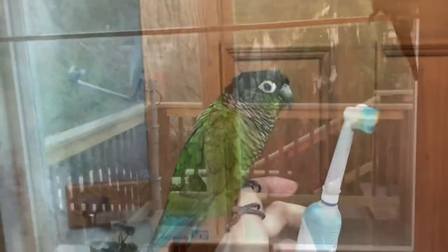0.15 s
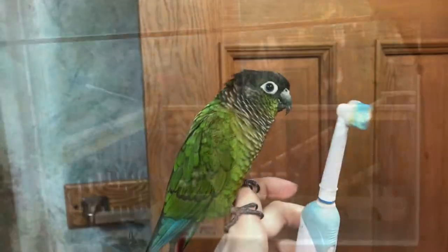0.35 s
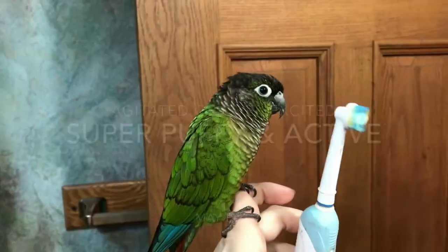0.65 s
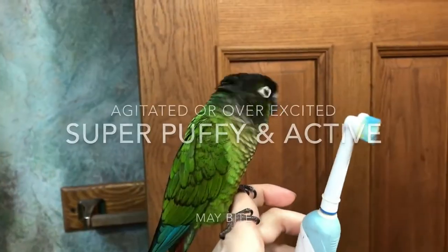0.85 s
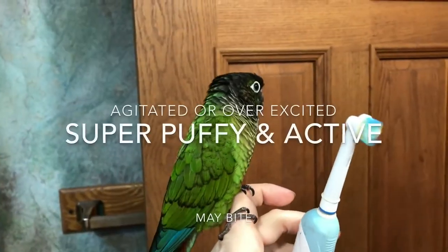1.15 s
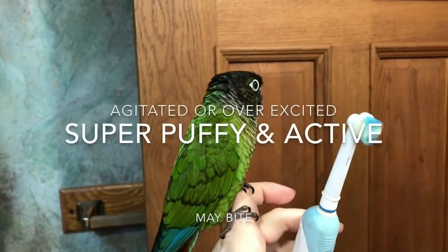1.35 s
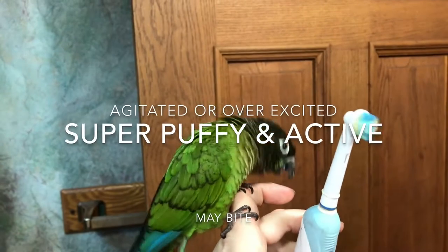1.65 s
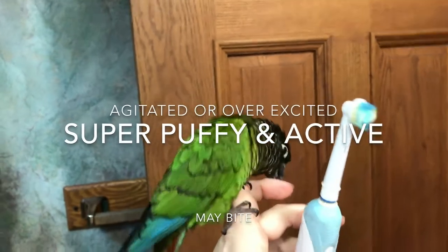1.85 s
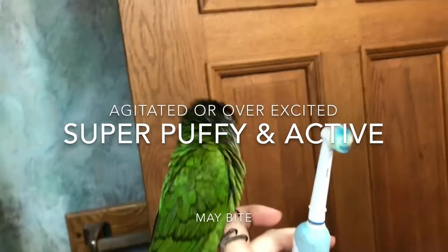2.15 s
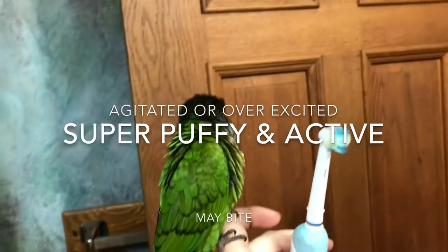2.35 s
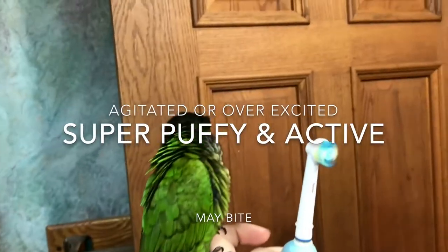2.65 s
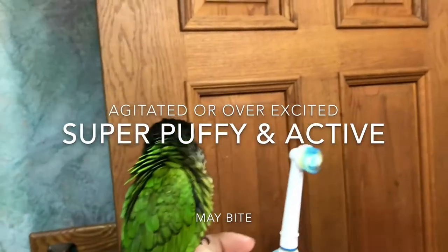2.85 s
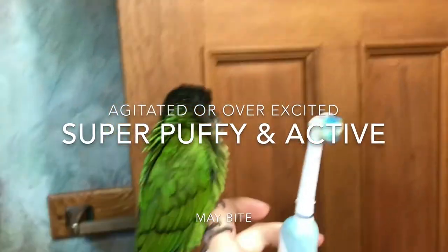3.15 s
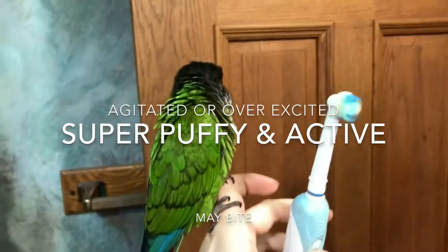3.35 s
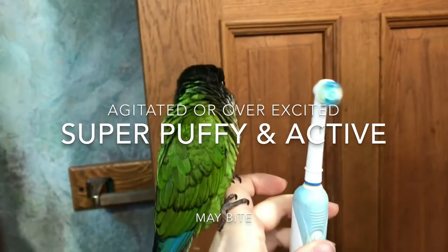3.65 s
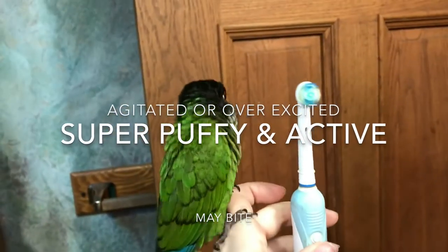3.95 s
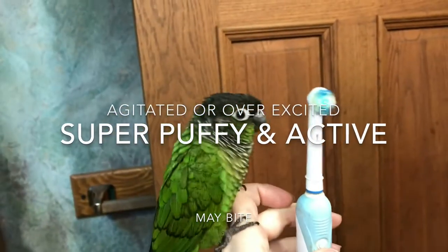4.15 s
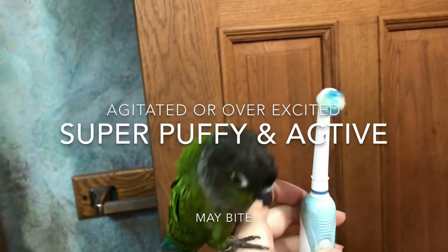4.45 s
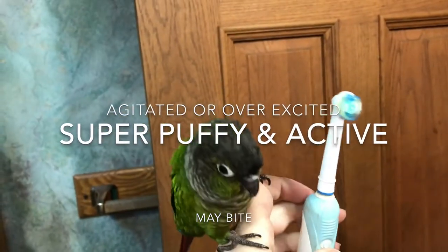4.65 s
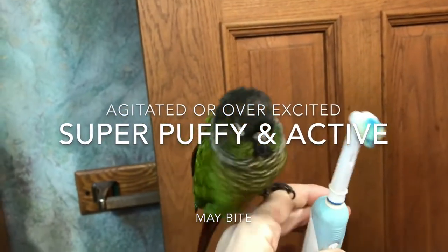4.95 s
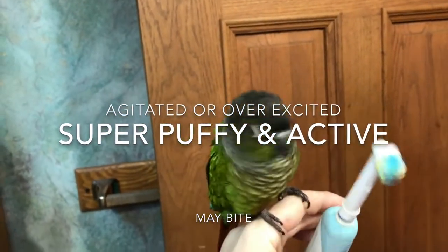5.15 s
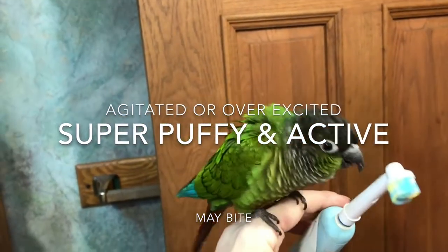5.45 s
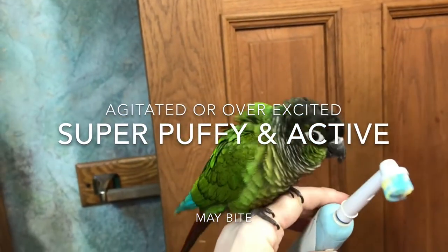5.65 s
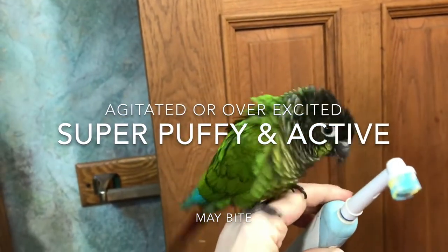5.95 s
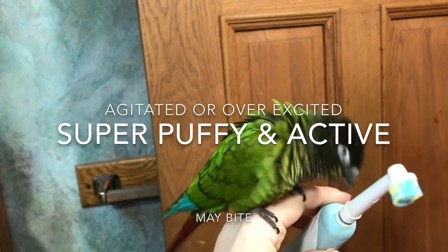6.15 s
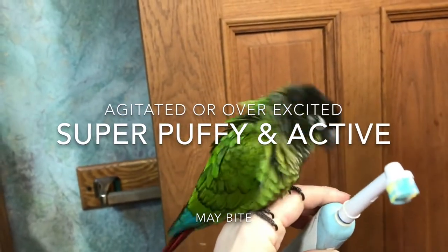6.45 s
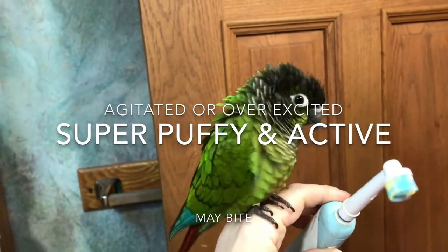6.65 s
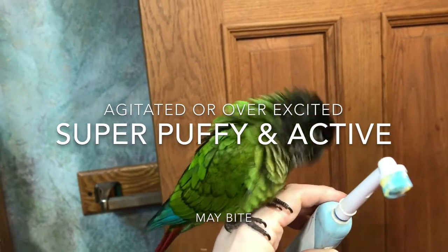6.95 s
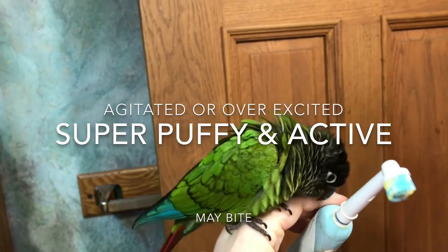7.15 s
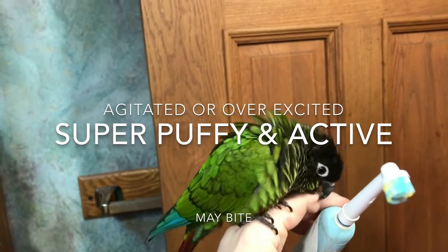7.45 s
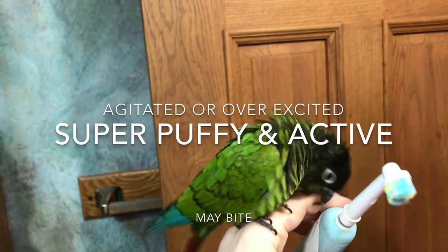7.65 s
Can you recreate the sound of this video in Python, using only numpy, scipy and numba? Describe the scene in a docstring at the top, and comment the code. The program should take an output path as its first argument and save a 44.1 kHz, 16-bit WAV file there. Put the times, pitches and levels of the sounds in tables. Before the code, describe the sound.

An electric toothbrush runs close to the microphone with a steady, rattling plastic buzz. At the start, two short, shrill bird shrieks echo from further off in the room. A small parrot nearby makes a few faint peeps, then gives a harsh, throbbing squawk and, a little later, a longer and louder one. The buzz turns slightly thinner between the two squawks. Low room noise and a faint hum lie behind.

```python
"""A panelled room, a phone microphone close to a running electric toothbrush. Two echoing shrieks, sung
with both sides of a bird's syrinx, open the scene; then a small parrot on a hand nearby peeps and gives
harsh, throbbing squawks. In the brush an 8-tooth pinion drives an 11-tooth wheel, and every mesh rattles
the plastic shell. Behind lie low room noise and a distant hum. The phone ducks under loud calls."""
import sys
import numpy as np
from scipy import signal
from scipy.fft import rfft, irfft
from scipy.io import wavfile
from scipy.ndimage import uniform_filter1d
from numba import njit

SR = 44100
rng = np.random.default_rng(int(sys.argv[2]) if len(sys.argv) > 2 else 0)


def int16_out(signal):
    """Quantize to a 16-bit WAV file."""
    q = np.round(np.clip(np.atleast_2d(signal).T, -1, 1) * 32767)
    wavfile.write(sys.argv[1], SR, q.astype(np.int16))


N = 343980
T = np.arange(N) / SR
RELEASE_S = .006  # of shrieks and squawks

# The two voices of the syrinx and their mixing tones: multiple of the lower voice, of the upper voice
SYRINX_TONES = [(1, 0), (0, 1), (-1, 2), (3, -1), (1, 1), (4, -1), (2, 1), (5, -1), (2, -1)]
# The same tones: level/dB
SYRINX_DB = [-3, -2.5, -3, -8, -17, -15, -16, -16, -30]
# Two shrieks, the second in two parts, a list of rows for each part: # t/s, lower voice f/Hz, upper voice f/Hz,
# level/dB, octave of the lower voice level/dB
SHRIEKS = [
    [(0, 3046, 4635, -19, 13), (.016, 3270, 4656, -9, 2), (.058, 3217, 4490, -11.5, -4),
     (.065, 3025, 4450, -26.5, 22), (.071, 3157, 4460, -13.5, 10), (.078, 3090, 4500, -47, 10)],
    [(.406, 2730, 4080, -34, 1), (.411, 2680, 4010, -27, -5), (.418, 2750, 4160, -29, 2)],
    [(.418, 3155, 4300, -33, 14), (.423, 3170, 4530, -27, 11), (.435, 3155, 4440, -20, -4),
     (.447, 3170, 4590, -28, 14), (.456, 2960, 4530, -27, 8.5), (.47, 2970, 3760, -24, 3),
     (.485, 3040, 3900, -38, 7)],
]
def shriek(rows, base_rough):
    """Two whistling voices in one windpipe mix into sum and difference tones."""
    start, end = rows[0][0], rows[-1][0]
    t = np.arange(start, end, 1 / SR)
    low_hz, high_hz, db, octave_db = curves(rows, t)
    # starts hoarse, clears, and frays again as the air runs out
    rough = base_rough + .37 * np.exp(-(t - start) / .011) + .3 * ((t - start) / (end - start)) ** 4
    low, high = (phase_of(hz * (1 + .049 * rough * wobble(len(t), 1400))) for hz in (low_hz, high_hz))
    tones = sum(undb(tone_db) * np.sin(a * low + b * high + k)
                for k, ((a, b), tone_db) in enumerate(zip(SYRINX_TONES, SYRINX_DB)))
    octave = undb(octave_db) * np.sin(2 * low)
    hiss = bandpass(bandpass(rng.standard_normal(len(t)), 2.2 * low_hz, 11000), 2.5 * low_hz, 13000)
    release = np.minimum((end - t) / RELEASE_S, 1)
    return undb(db) * release * (tones + octave + 2.7 * rough * hiss)


# Squawk syllables close to the phone: t/s, length/s, start and end level/dB, start and end pitch f/Hz,
# start and end throat f/Hz, roughness/0-1, throb f/Hz, throb depth/0-1, low, high and top band level/dB
SQUAWKS = [(4.482, .062, -48.5, -17.5, 2710, 3380, 2800, 3570, 0.63, 88, 0.8, -21, -14, -19),
           (4.548, 0.031, -20.5, -18.5, 3305, 3220, 3350, 3300, .55, 209, 0.6, -10, -8.5, -12),
           (4.579, .117, -22.5, -26.5, 3190, 3020, 3400, 3070, 0.67, 206, 0.76, -14, -6, -6.5),
           (6.142, 0.028, -17, -11.5, 858, 917, 3840, 3550, 0.39, 220, 0.28, -10, -5.5, -14),
           (6.172, .066, -17.5, -13.5, 887, 968, 3480, 3900, 0.69, 258, 0, -12, -2.5, -21),
           (6.237, .033, -17.5, -15.5, 1253, 1163, 4180, 4650, .4, 273, 0, -2, -4.5, -24),
           (6.267, 0.094, -26.5, -17, 1411, 1480, 3800, 4300, .7, 253, 0.46, -8, -2, -8.5),
           (6.349, .042, -12, -12.5, 1302, 1369, 3940, 4120, 0.61, 205, 0.23, -15, -3.5, -11.5),
           (6.391, 0.12, -14.5, -36, 1354, 1360, 4200, 4120, 0.76, 280, 0.3, -4, -7, -11)]
def squawk(length, start_db, end_db, start_hz, end_hz, throat_start_hz, throat_end_hz,
           rough, throb_hz, start_depth, low_db, high_db, top_db):
    """Unsteady membrane pulses and rushing air, chopped by a slower throb, ring the throat and beak."""
    t = np.arange(0, length + RELEASE_S, 1 / SR)
    # the throb deepens as the air runs out
    db, hz, throat_hz, depth = curves([(0, start_db, start_hz, throat_start_hz, start_depth),
                                       (length, end_db, end_hz, throat_end_hz, start_depth + .3)], t)
    envelope = np.clip(np.minimum(t / .0035, 1 + (length - t) / RELEASE_S), 0, 1)
    phase = phase_of(hz * (1 + .0847 * rough * wobble(len(t), 560)))
    pulses = sum(np.cos(k * phase + .36 * k * k) * (k * hz < TOP_HZ) for k in range(1, 17))
    source = (1 - rough) * level(pulses, 0) + rough * rng.standard_normal(len(t))
    throb = phase_of(throb_hz * (1 + .02 * wobble(len(t), 140)))
    opening = .59 * (.5 - .5 * np.cos(throb)) ** 2.6
    uneven = undb(1.5 * wobble(len(t), 200))
    source *= uneven * (1 - np.clip(depth, 0, 1) * (1 - opening))
    # throat (damped by a deep throb), side chamber, pipe overtones and beak: f/Hz, width/Hz, level/dB
    bands = [(throat_hz, 420 + 800 * depth.mean(), 0), (2450, 700, low_db), (5500, 1500, high_db - .5),
             (2 * throat_hz, 1400, high_db), (2.68 * throat_hz, 5500, top_db),
             (1700, 1100, -11 - 15 * depth)]
    voice = sum((-1) ** k * level(bandpass(bandpass(source, centre, width), centre, width), band_db)
                for k, (centre, width, band_db) in enumerate(bands))
    return undb(db) * envelope * voice


# Faint peeps of the parrot on the hand: t/s, length/s, start f/Hz, end f/Hz, level/dB
PEEPS = [(1.826, 0.022, 3280, 3970, -44), (1.881, 0.025, 2090, 2340, -42), (1.914, 0.035, 3500, 4420, -40),
         (1.968, .015, 4350, 3820, -40), (2.108, 0.011, 2500, 3050, -41), (2.116, 0.018, 3270, 3800, -37)]
def peep(length, start_hz, end_hz, db):
    """A soft, scratchy gliding whistle."""
    size = int(length * SR)
    scratch = 1 + 1.2 * wobble(size, 1500)
    return undb(db) * np.hanning(size) * scratch * np.sin(phase_of(np.linspace(start_hz, end_hz, size)))


def bird_calls(room_t60_s=.33, beak_cut_hz=1330):
    """Two shrieks, then the nearby parrot; the walls answer shrieks and squawks with a dense echo."""
    t = T[:SR // 2]
    walls = rng.standard_normal(len(t)) * undb(-60 * t / room_t60_s) * (t > .004)
    walls /= np.sqrt(np.sum(walls ** 2))
    shrieks = sum(place(rows[0][0], shriek(rows, rough)) for rows, rough in zip(SHRIEKS, (.12, .22, .17)))
    squawks = sum(place(s, squawk(*call)) for s, *call in SQUAWKS)
    # so small a bird radiates no lows
    squawks = signal.sosfilt(signal.butter(4, beak_cut_hz, "high", fs=SR, output="sos"), squawks)
    peeps = sum(place(s, peep(*call)) for s, *call in PEEPS)
    echo = signal.fftconvolve(undb(-11.5) * shrieks + undb(-10) * squawks, walls)[:N]
    return shrieks + squawks + peeps + echo


# Pinion teeth inside the brush: lateness/tooth, thud level/dB, knock level/dB, rattle level/dB
PINION = [(-0.041, 1.5, -17, -4), (0.097, -21, 34, -12.5), (0.076, 4.5, -4.5, -46), (0.2, -15, -27, -1),
          (0.18, 8.5, 31, -16.5), (-0.23, -25, -1.5, -4), (-0.19, -18, -9, -0.5), (-0.047, 7, -6, -9.5)]
# Wheel teeth, added to knock and rattle: level/dB
WHEEL_DB = [0.5, 0, 2, 0.5, 0, 3, 1.5, -5, -1.5, 1.5, -1.5]
def gears(teeth):
    """Each mesh of two teeth gives a thud; loose parts knock and rattle after it over a steady scrape."""
    mesh = np.arange(int(teeth[-1]) - 1)
    late, thud_db, knock_db, rattle_db = np.array(PINION)[mesh % len(PINION)].T
    wheel_db = np.array(WHEEL_DB)[mesh % len(WHEEL_DB)]
    thud_scatter, jitter, knock_scatter, rattle_scatter = rng.standard_normal((len(mesh), 4)).T

    def blows(lag, strength):
        times = np.interp(mesh + .5 + late + lag, teeth, T)
        return np.bincount((times * SR).astype(int), strength, N)

    # the wheel runs off centre, swinging the moment and strength of the thuds
    turn = 2 * np.pi * mesh / len(WHEEL_DB)
    thud = blows(.14 * np.sin(turn), undb(thud_db + 1.3 * thud_scatter) * (1 + .35 * np.cos(turn)))
    thud = level(thud, 0) + .55 * rng.standard_normal(N)
    chatter = np.exp(-T[:200] / .00054)
    knock = np.convolve(blows(.024 * jitter, undb(knock_db + wheel_db + .83 * knock_scatter)), chatter)
    rattle = np.convolve(blows(.054 * jitter, undb(rattle_db + wheel_db + .65 * rattle_scatter)), chatter)
    return thud, level(knock[:N] + .15, 0), level(rattle[:N] + .2, 0)


# Modes of the brush's neck and head, close to the phone: upright f/Hz, tilted f/Hz, width/Hz,
# upright level/dB, tilted level/dB, share of knock against rattle/0-1
NECK_MODES = [(2300, 2610, 750, -6.5, -11.5, 0), (3350, 3100, 510, -7.5, -14, 0.23),
              (4370, 3810, 1720, -3, -1.5, 0), (5450, 5450, 570, -5, -5, 0.27),
              (6440, 6800, 980, 1.5, 1.5, .1), (9300, 8850, 1260, -3.5, 0, 0),
              (10880, 11620, 960, -9, -9, 0), (13950, 13800, 3700, -8.5, -3.5, 0.1)]
def neck(knock, rattle, tilt):
    """The same knocks and rattles ring the modes of the neck and head as a noisy buzz."""
    sound = 0
    for hz, tilted_hz, width, db, tilted_db, share in NECK_MODES:
        drive = rng.choice([-1., 1.], N) * (share * knock + (1 - share) * rattle)
        centre = hz + tilt * (tilted_hz - hz)
        ring = bandpass(bandpass(drive, centre, width), centre, 4.3 * width)
        sound += level(ring, db + tilt * (tilted_db - db))
    return level(sound, 0)


# Modes of the plastic shell, close to the phone: f/Hz, width/Hz, level/dB
SHELL_MODES = [(683, 220, -7.5), (906, 43, -2.5), (1052, 73, -1.5), (1226, 86, 0), (1457, 280, -1.5),
               (2110, 390, -5.5)]
def shell(thud, tilt, db_per_octave=9, pivot_hz=1150):
    """The thuds ring the shell; tilting thins its lower modes."""
    sound = 0
    for k, (hz, width, db) in enumerate(SHELL_MODES):
        gain = undb(db + db_per_octave * tilt * np.log2(hz / pivot_hz))
        sound += (-1) ** k * gain * bandpass(thud, hz, width) / width ** .5
    return level(sound, -10 - 1.5 * tilt)


# Faint tones of the gears at close range: multiple of the pinion speed
GEAR_TONES = [10, 12, 13, 24, 14, 16, 21, 22]
# The same tones, brush upright: level/dB
GEAR_TONES_DB = [-29, -27, -23, -27, -32, -32, -34, -34]
# Their change at full tilt: level/dB
GEAR_TONES_TILT_DB = [-10, -1.5, -2, 3, 9, 13, 3, -5]
def whirr(teeth, tilt, start_hz=930, end_hz=1135):
    """The gears sing faintly, and a whirr glides up each time the same two teeth come round to meet."""
    angle = 2 * np.pi * teeth / len(PINION)
    round_share = (teeth / (len(PINION) * len(WHEEL_DB)) + .25) % 1
    swell = np.sin(np.pi * round_share ** 2)
    glide = undb(-9.5 - 12 * tilt) * np.sin(phase_of(start_hz + round_share * (end_hz - start_hz)))
    overtone = undb(-30 + 19.5 * tilt) * np.sin(15 * angle)  # takes over from the glide when tilted
    tones = sum(undb(db + tilt_db * tilt + .92 * wobble(N, 7.1)) * np.sin(k * angle)
                for k, db, tilt_db in zip(GEAR_TONES, GEAR_TONES_DB, GEAR_TONES_TILT_DB))
    return swell * (glide + overtone) + tones


# The hand tilts the brush in front of the phone: t/s, tilt/0-1
TILT = [(0, 0.11), (3.6, 0.3), (4.2, 0.21), (5.0, 0.24), (5.4, 1), (6.8, 1)]
def toothbrush(start_turns_per_s=72.49, sag_turns_per_s2=.146):
    """The gears shake neck and shell; the pinion slows as the battery sags."""
    tilt = curves(TILT, T)[0]
    teeth = np.cumsum(start_turns_per_s - sag_turns_per_s2 * T) * len(PINION) / SR  # teeth passed so far
    thud, knock, rattle = gears(teeth)
    sound = whirr(teeth, tilt) + neck(knock, rattle, tilt) + shell(thud, tilt)
    facing = undb(-35 - 1.5 * tilt)  # the shell turns its back on the phone
    return fade_in() * facing * sound


# Room tone at the microphone: f/Hz, relative spectral level/dB
ROOM_SPECTRUM = [(21, -33), (35, -2), (70, 2.5), (118, -3.5), (166, -10.5), (210, -7), (533, -10),
                 (800, -14), (1040, -64), (1760, -120)]
def room_tone():
    """The low noise of the room."""
    hz, db = np.transpose(ROOM_SPECTRUM)
    bins_hz = np.arange(N // 2 + 1) * SR / N + 1
    spectrum = undb(np.interp(np.log(bins_hz), np.log(hz), db))
    noise = irfft(rfft(rng.standard_normal(N)) * spectrum, N)
    return level(noise, -52) * fade_in()


# A hum far from the microphone: t/s, level/dB
HUM_SWELLS = [(0.0, -61), (0.59, -59.5), (1.93, -64), (2.93, -47), (4.74, -66), (5.28, -48), (5.32, -56),
              (7.71, -62), (7.8, -73)]
def distant_hum(hum_hz=78, upper_hz=162):
    """A swelling, wandering hum, with a tone of steady pitch about an octave over it."""
    phase = phase_of(hum_hz + 3 * wobble(N, 2.5))
    hum = undb(curves(HUM_SWELLS, T)[0] + 5.6 * wobble(N, 9.4)) * np.sin(phase)
    upper = undb(-59 + 3.1 * wobble(N, 9.6)) * np.sin(2 * np.pi * upper_hz * T)
    return hum + upper


def fade_in():
    """Brush and room tone come up by 4 dB in the first moments."""
    return undb(np.interp(T, [.29, .56], [-4, 0]))


def undb(db):
    return 10 ** (np.asarray(db) / 20)


def level(x, db):
    return x * undb(db) / np.sqrt(np.mean(x ** 2))


def phase_of(hz):
    return 2 * np.pi * np.cumsum(hz) / SR


def curves(table, t):
    """The columns of a table, joined by straight lines over the times t."""
    s, *columns = np.transpose(table)
    return [np.interp(t, s, c) for c in columns]


def wobble(size, hz):
    """Smooth chance with spread 1 that changes about hz times a second."""
    k = max(int(SR / hz), 1)
    x = uniform_filter1d(uniform_filter1d(rng.standard_normal(size), k), k)
    return x / x.std()


def place(s, sound):
    """The sound at time s in a silent track."""
    at = int(s * SR)
    return np.pad(sound, (at, N - at - len(sound)))


@njit
def bandpass(x, hz, width):
    """A resonance with gain 1 at its centre, which may move."""
    centre = hz * np.ones(len(x))
    y, band, low = np.empty(len(x)), 0., 0.
    for i in range(len(x)):
        g, damping = np.tan(np.pi * centre[i] / SR), width / centre[i]
        v = (band + g * (x[i] - low)) / (1 + g * (g + damping))
        band, low, y[i] = 2 * v - band, low + 2 * g * v, damping * v
    return y


@njit
def follow(x, attack_s, release_s):
    """Loudness that rises fast and sinks slowly."""
    y, loud = np.empty(len(x)), x[0]
    for i in range(len(x)):
        loud += (x[i] - loud) / (SR * (attack_s if x[i] > loud else release_s))
        y[i] = loud
    return y


def scene():
    """Bird calls and brush, the room behind them, in mono."""
    return (bird_calls() + toothbrush() + room_tone() + distant_hum())[None]


TOP_HZ = 15750  # upper limit of the phone
def record(dry):
    """The phone's gain ducks under loud calls and creeps back; peaks are rounded and the top is cut."""
    loud = follow(np.abs(dry[0]), attack_s=.018, release_s=.12)
    gain = np.minimum(undb(-34.5) / loud, 1) ** .1
    rounded = .9 * np.tanh(dry * gain / .9)
    return signal.sosfilt(signal.ellip(10, .2, 80, TOP_HZ, fs=SR, output="sos"), rounded)


dry = scene()
out = record(dry)
int16_out(out)
```